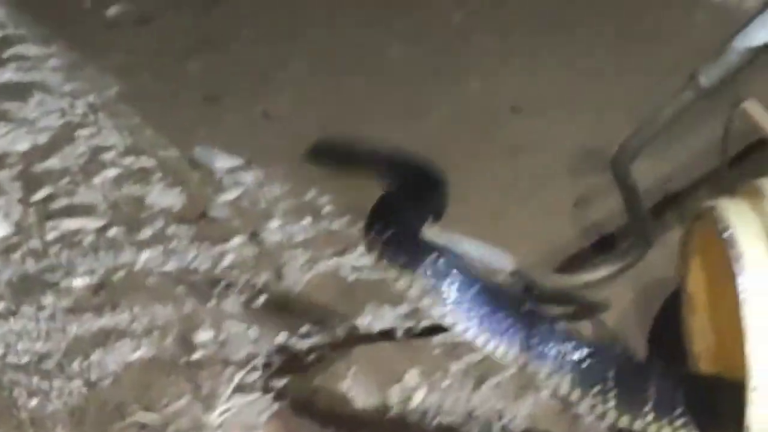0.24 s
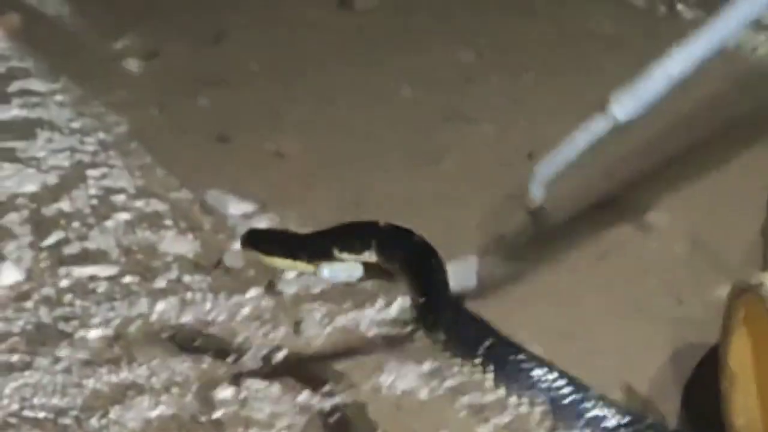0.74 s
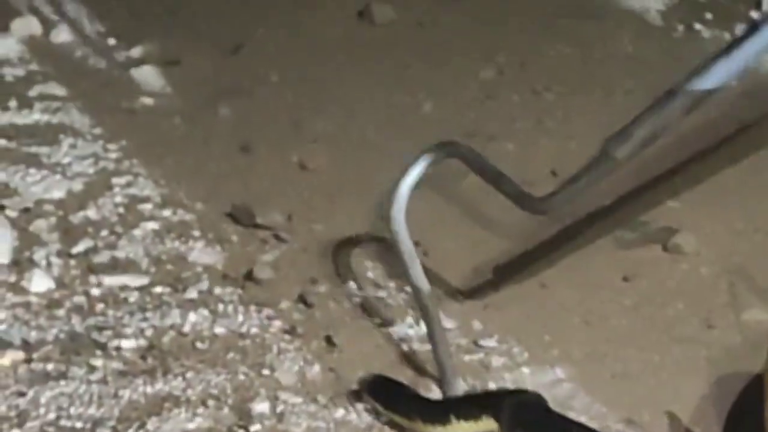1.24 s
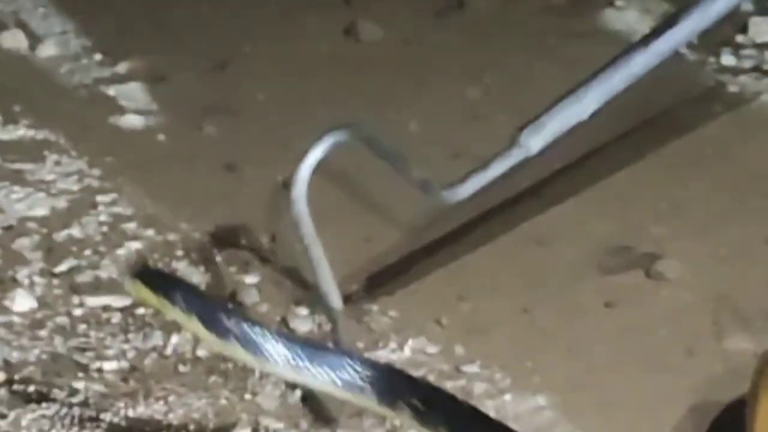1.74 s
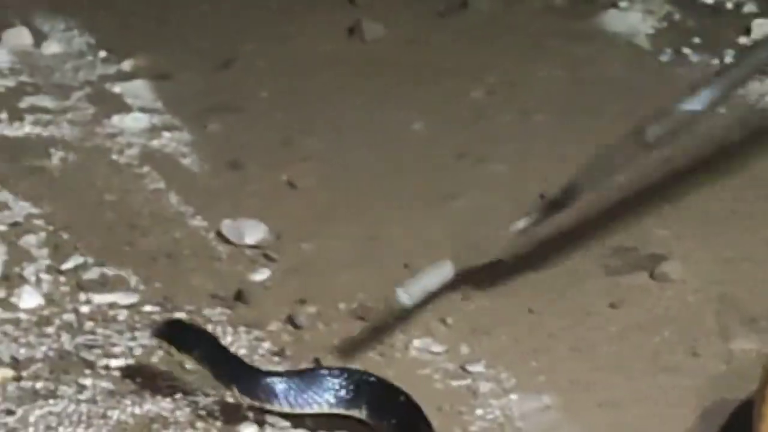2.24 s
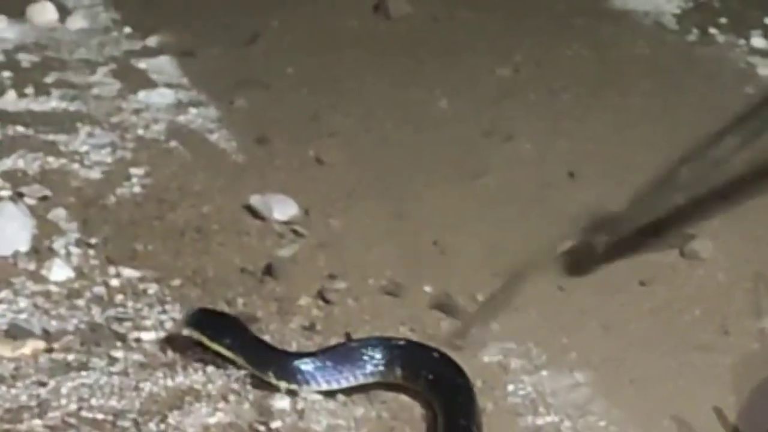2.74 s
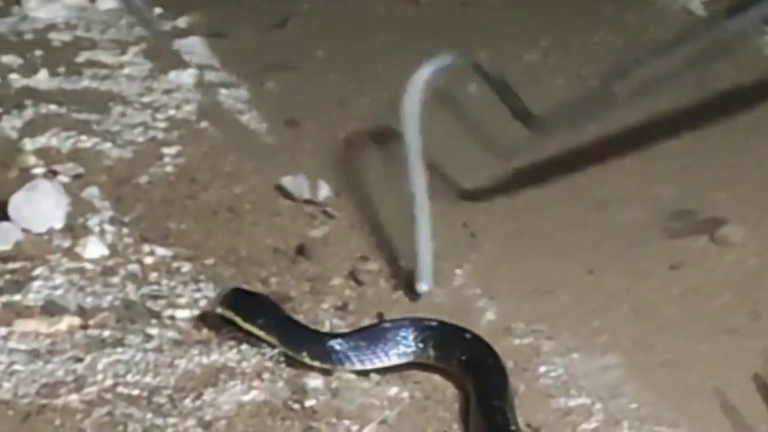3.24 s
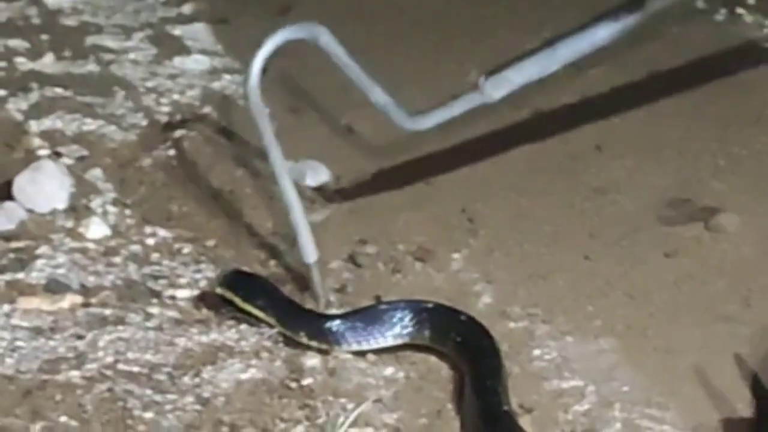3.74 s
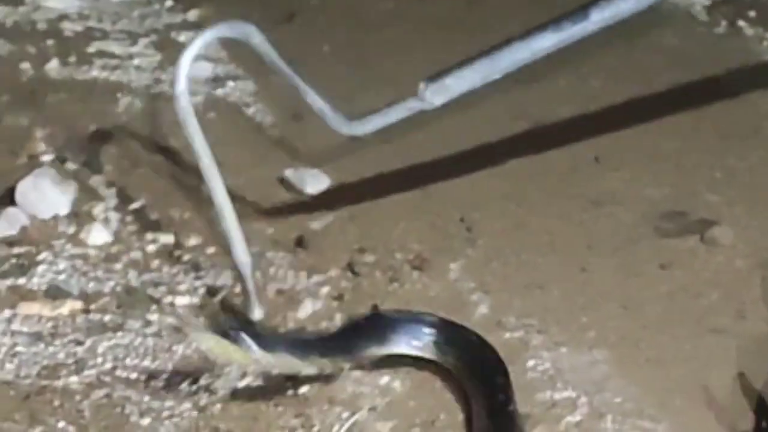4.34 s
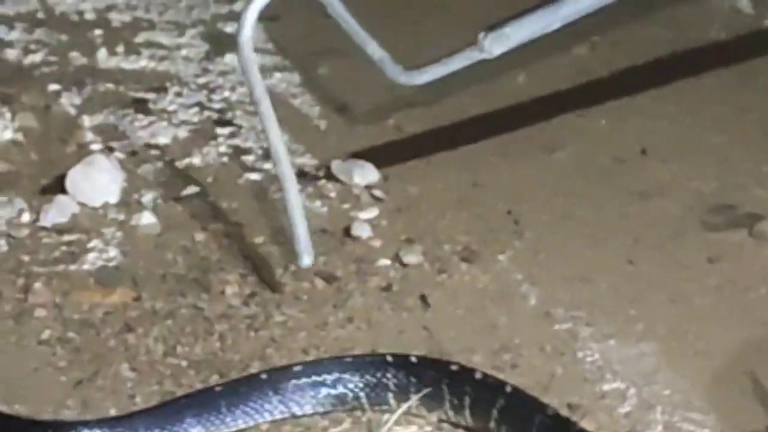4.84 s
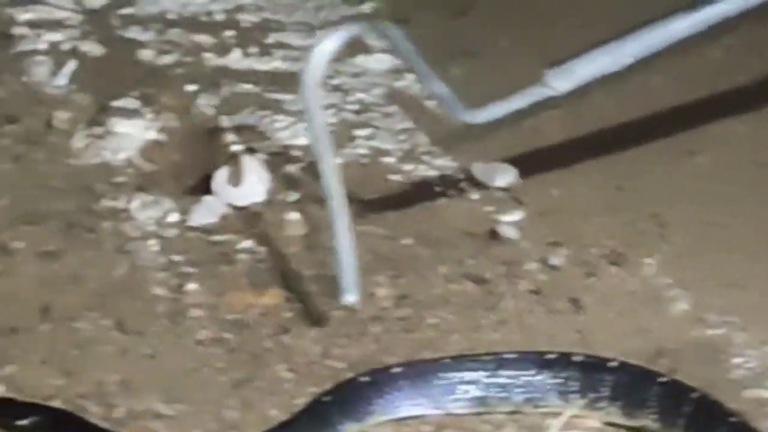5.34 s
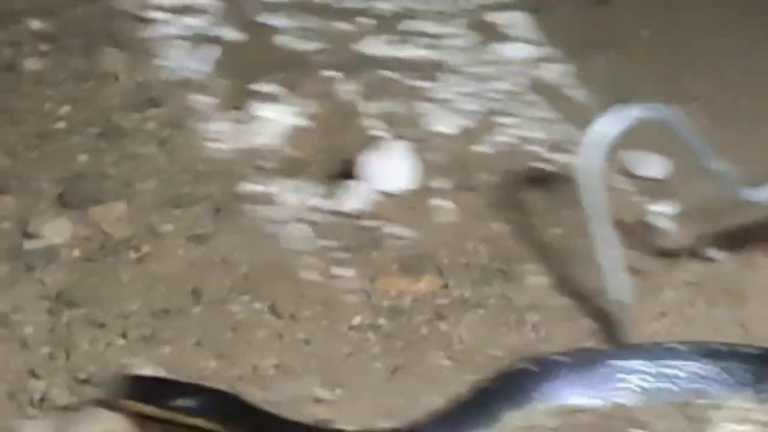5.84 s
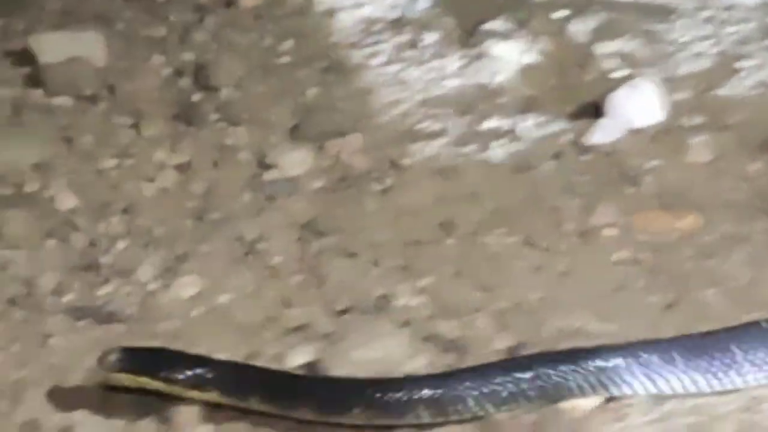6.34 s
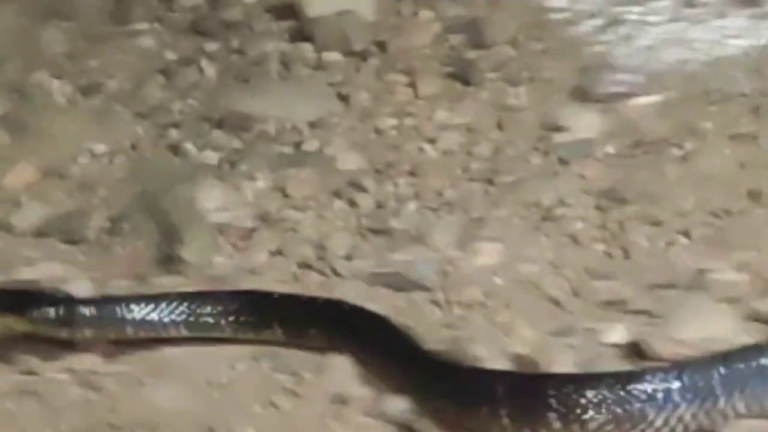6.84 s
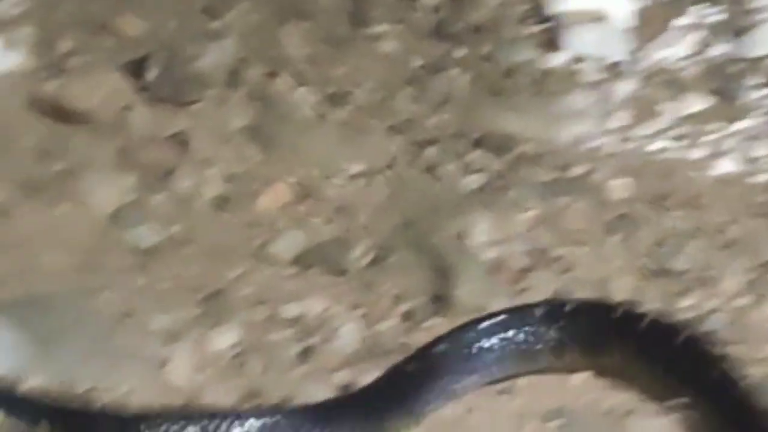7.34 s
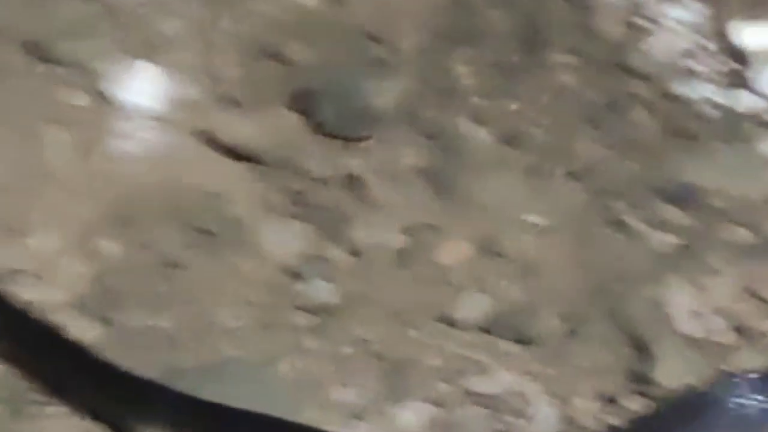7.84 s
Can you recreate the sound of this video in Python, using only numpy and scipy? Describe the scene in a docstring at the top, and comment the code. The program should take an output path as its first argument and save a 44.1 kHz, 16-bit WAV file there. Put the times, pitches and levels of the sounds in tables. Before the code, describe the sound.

A metal hook clicks, then clanks down and rings briefly, amid soft gravel footsteps and steady night insects.

```python
"""Night insects and a snake hook on gravel

Crickets trill with their wings, one chirps fast, and a katydid rasps in double strokes, over far
insect hiss, murmuring air and a faint hum. Shoes scuff and crunch softly on gravel. The metal hook
that steers a snake clicks now and then; once, just after a faint metallic hiss, it clanks down,
rings and rattles."""
import sys
import numpy as np
from scipy import signal
from scipy.fft import rfft, irfft
from scipy.io import wavfile

SR = 44100
rng = np.random.default_rng(int(sys.argv[2]) if len(sys.argv) > 2 else 0)


def output_pcm(signal):
    """Save a mono or channel-first signal as 16-bit PCM at the path in sys.argv[1].

    Samples are clipped to [-1, 1] before scaling.
    """
    pcm = np.clip(np.atleast_2d(signal).T, -1, 1) * 32767
    wavfile.write(sys.argv[1], SR, np.round(pcm).astype(np.int16))


N = 357210
TIME_S = np.arange(N) / SR
FREQS_HZ = np.maximum(np.arange(N // 2 + 1) * SR / N, 1)

# noise likeness between the ears: f/Hz, correlation
EAR_CORRELATION = [(25, 0.14), (80, 0.61), (250, 0.67), (600, 0.27), (1400, 0.047), (3000, 0.000055),
                   (14000, 0.042)]
# spectra of the air, three far insect bands and the katydid: f/Hz, relative density/dB
AIR_SPECTRUM = [(12, 0), (32, 3), (75, -4), (180, -10.5), (300, -18), (600, -21.5), (1000, -27),
                (1350, -25), (1800, -35), (4200, -38), (14000, -41)]
FAR_LOW_SPECTRUM = [(1850, -20), (2050, -14), (2170, -10.5), (2330, 1), (2620, -9), (2830, -44),
                    (2970, -16.5), (3250, -11.5), (3400, -15), (3700, -12), (3870, -15.5), (4100, -36)]
FAR_HIGH_SPECTRUM = [(4150, -26), (4500, -6.5), (4900, -7.5), (5700, -0.5), (6900, 0.5), (7400, -5.5),
                     (8000, -20), (9000, -32)]
FAR_TOP_SPECTRUM = [(6500, -30), (8000, -3.5), (9000, 4.5), (10200, 1.5), (11500, -2.5), (13000, -3),
                    (14300, -7)]
RASP_SPECTRUM = [(8000, -39), (9500, -12.5), (10500, -3.5), (11300, -3.5), (12000, -3.5), (12700, -17),
                 (14500, -21)]
# trilling crickets: f/Hz, level/dB, stroke rate/Hz
TRILLS = [(2033, -75.5, 26), (2250, -69, 37), (2304, -63.5, 38), (2366, -64.5, 38.5), (2398, -69.5, 40),
          (2490, -79.5, 47), (3546, -73, 39), (3740, -73.5, 56)]
# chirping cricket, fading then swelling: t/s, level/dB
CHIRP_LEVELS = [(0, -68.5), (.55, -73), (1.6, -79.5), (5.7, -78.5), (6.3, -68.5), (6.75, -63.5), (7.2, -68),
                (8.1, -71.5)]
# katydid pace: number of calls, period/s
KATYDID_PACE = [(9, .3235), (3, .306), (4, .3515), (9, .33)]

# shoe scuffs: t/s, length/s, relative level/dB
SCUFFS = [(0.0, .07, -59.5), (.095, 0.12, -60), (.52, 0.23, -73), (1.0, 0.24, -72.5), (1.8, 0.56, -67),
          (2.12, .04, -59), (2.195, 0.03, -55), (2.39, 1, -67), (3.1, 0.19, -68.5), (3.6, 0.22, -77.5),
          (4.39, .08, -71), (4.6, 0.61, -67), (4.79, 0.12, -59), (5.41, 0.065, -76), (5.8, 0.028, -68),
          (5.95, 0.42, -67), (6.155, .11, -53.5), (6.3, 0.22, -64), (6.55, 0.99, -66.5),
          (7.55, 0.42, -71.5), (8.07, .03, -56)]
# pebble knocks: t/s, relative level/dB
KNOCKS = [(0.033, -36.5), (0.057, -46), (0.105, -45), (0.195, -46), (0.215, -46), (0.331, -47),
          (1.135, -47), (2.553, -45.5), (2.804, -49), (3.305, -37.5), (5.977, -46.5), (6.729, -36.5),
          (7.76, -48)]
# spectra of grit and pebbles: f/Hz, relative density/dB
GRIT_SPECTRUM = [(100, -28), (200, -1.5), (400, 0.5), (800, 0), (1100, -4.5), (1600, 0), (2300, -5),
                 (3500, -5.5), (4300, -8.5), (6500, -6.5), (8200, -14.5), (13000, -15.5), (15000, -24)]
PEBBLE_SPECTRUM = [(120, -4), (350, -6.5), (700, -0.5), (1100, -2), (1600, 0.5), (2200, -12), (4000, -22),
                   (9000, -27), (15000, -40)]
# hollow tones of shuffling: t/s, f/Hz, level/dB, width/s
HOLLOWS = [(.08, 400, -69, 0.073), (.15, 760, -65.5, 0.088), (.17, 227.6, -66, 0.068),
           (2.05, 300, -74, 0.17), (3.82, 1353, -75, 0.16), (4.78, 840, -67.5, 0.2),
           (4.88, 420, -63, 0.065), (4.98, 320, -66, 0.12), (6.48, 505, -54, 0.015), (7.43, 340, -69, .04)]

# light hook contacts: t/s, level/dB, t60/s, relative sparkle/dB
CLICKS = [(1.138, -44, 0.1, -10), (2.474, -49, .025, -18), (2.8473, -25, 0.089, -12),
          (2.967, -39, 0.069, -22), (3.183, -48, 0.11, -14), (4.781, -48, 0.036, -13),
          (4.861, -40, 0.13, -8), (4.884, -36, 0.083, -0.5), (7.2864, -43, 0.032, -6),
          (7.2905, -35.5, 0.047, -9)]
# modes of the lightly touched hook: f/Hz, relative level/dB
CLICK_MODES = [(3060, -8), (3520, -11), (4500, -13), (4880, -9), (5850, -3), (6500, -4), (6950, 0),
               (7340, 0), (9400, -12), (12550, -12), (13150, -12)]
# spectra of a click, its fine top and the clank's crack: f/Hz, relative density/dB
CLICK_SPECTRUM = [(400, -29), (1500, -22), (3500, -14), (4200, -11), (5000, -8), (5850, -1.5), (6200, -2),
                  (6700, -1), (7350, 2), (8000, -14), (10000, -10), (11500, -16), (13000, -33),
                  (14500, -32)]
SPARKLE_SPECTRUM = [(7000, -14), (8500, -6), (10000, -7), (11500, -7), (12600, 0), (13400, 0), (14500, -6)]
CRACK_SPECTRUM = [(100, -5.5), (330, -17.5), (520, 4.5), (950, -20), (1550, 4), (2900, 1.5), (4200, -1),
                  (5200, 2.5), (7000, -9), (9000, -9.5), (14000, -15)]
# modes of the struck hook: f/Hz, relative level/dB, t60/s, left minus right/dB
HOOK_MODES = [(520, -41, .07, -4), (660, -47, .18, -3), (1150, -55, .2, -3), (1480, -38, .13, -3),
              (1952, -43, .25, 0), (2169, -28.5, .17, 1), (2432, -41, .28, 6), (2688, -37, .2, 0),
              (2918, -33, .26, -12), (3066, -25.5, .2, -10), (3510, -39, .24, 0), (3976, -32, .2, 0),
              (4040, -32, .26, -2), (4500, -42, .25, 0), (4846, -33, .22, 1), (5262, -33, .18, -12),
              (5305, -25, .2, -19), (5832, -27, .18, -12), (6408, -28, .2, -16), (6452, -17, .21, -22),
              (6971, -28, .3, -13), (7342, -34, .28, -12), (7930, -43, .18, 0), (8640, -35, .15, 2),
              (9340, -45, .18, 2), (10070, -43, .17, -12), (11800, -47, .2, 1), (12510, -49, .22, -3),
              (13200, -47, .17, -5), (13640, -49, .22, -4)]
# metallic rattles: t/s, length/s, relative level/dB
# row two is a faint metallic hiss just before the clank; in the others the tip scrapes the ground
RATTLES = [(1.18, 0.022, -54.5), (2.82, 0.038, -46), (2.868, 0.02, -27.5), (2.92, .08, -45.5),
           (3.025, .06, -43.5), (3.11, 0.03, -51.5), (3.595, 0.022, -63), (5.43, 0.035, -58)]
# drive of the modes in a rattle: f/Hz, relative gain/dB
RATTLE_DRIVE = [(500, -22), (2000, -15), (3000, -8), (4000, -11), (4850, 0), (5300, -8), (5850, 2),
                (6450, -7), (7200, 2), (8200, -15), (13500, -17)]


def from_db(db):
    """Decibels to gain."""
    return 10 ** (np.asarray(db) / 20)


def unit_rms(x):
    """Scale to unit power."""
    return x / np.sqrt(np.mean(x ** 2) + 1e-20)


def at_hz(points, hz):
    """Interpolate on a log-frequency axis."""
    points_hz, values = np.transpose(points)
    return np.interp(np.log(hz), np.log(points_hz), values)


def pan(side_db):
    """Constant-power gains; positive is left."""
    return unit_rms(from_db(np.array([[side_db], [-side_db]]) / 2))


def drift(rate_hz):
    """Random wander of unit RMS."""
    size = 8192
    hz = np.arange(size // 2 + 1) * SR / N
    slow = irfft(rfft(rng.standard_normal(size)) / (1 + (hz / rate_hz) ** 2))
    return np.interp(TIME_S, np.linspace(0, N / SR, size), unit_rms(slow))


def white():
    """Independent noise at each ear."""
    return rng.standard_normal((2, N))


def colour(pair, spectrum):
    """Shape a noise pair to a spectrum at unit RMS; the ears are alike mainly in the bass."""
    alike = np.clip(at_hz(EAR_CORRELATION, FREQS_HZ), -1, 1)
    rolloff = 1 / (1 + (spectrum[0][0] / FREQS_HZ) ** 4) / (1 + (FREQS_HZ / spectrum[-1][0]) ** 4)
    mid, side = rfft(pair) * from_db(at_hz(spectrum, FREQS_HZ)) * rolloff
    return unit_rms(irfft(np.sqrt(1 + alike) * mid + np.sqrt(1 - alike) * side * [[1], [-1]], N))


def grains(per_s, spread_db):
    """Random tiny contacts of uneven size."""
    hits = rng.random(N) < per_s / SR
    sizes = from_db(spread_db * np.minimum(rng.exponential(1, N), 3.5))
    return hits * sizes * white()


def burst(start_s, t60_s, rise_s):
    """Envelope of one contact."""
    out, first = np.zeros(N), max(int(start_s * SR), 0)
    age_s = TIME_S[:min(int(2 * t60_s * SR), N - first)]
    out[first:first + len(age_s)] = -np.expm1(-age_s / rise_s) * from_db(-60 * age_s / t60_s)
    return out


def swells(rows, attack_s, release_s):
    """Envelope of swells that build, hold and die away; powers add."""
    power = np.zeros(N)
    for start_s, length_s, db in rows:
        span = slice(max(int(start_s * SR), 0), int((start_s + length_s + 8 * release_s) * SR))
        age_s = np.maximum(TIME_S[span] - start_s, 0)
        rise = -np.expm1(-age_s / attack_s)
        fall = np.exp(-np.maximum(age_s - length_s, 0) / release_s)
        power[span] += (from_db(db) * rise * fall) ** 2
    return np.sqrt(power)


def scatter(x, t60_s, wet_db):
    """Ground, walls and plants add a diffuse tail, different at each ear."""
    age_s = TIME_S[:int(t60_s * SR)]
    tail = rng.standard_normal((2, len(age_s))) * from_db(-60 * age_s / t60_s)
    tail /= np.sqrt(np.sum(tail ** 2, axis=1, keepdims=True))
    return x + from_db(wet_db) * signal.fftconvolve(np.atleast_2d(x), tail, axes=1)[:, :N]


def night_bed():
    """Far insects merge into bands of hiss above the murmur of the air."""
    low = from_db(-61) * colour(white(), FAR_LOW_SPECTRUM) * pan(-1.4)
    high = from_db(-67.5) * colour(white(), FAR_HIGH_SPECTRUM) * pan(-4.5) * from_db(.48 * drift(19))
    top = from_db(-74) * colour(white(), FAR_TOP_SPECTRUM) * pan(3.7)
    air = from_db(-60.5) * colour(white(), AIR_SPECTRUM)
    return low + high + top + air


def far_hum(hz=80.7, level_db=-69.5):
    """A faint low tone, wavering in phase and level."""
    tone = np.sin(2 * np.pi * hz * TIME_S + .8 * drift(2.8))
    return from_db(level_db) * unit_rms(tone * from_db(2 * drift(3.3)))


def wing_song(hz, strokes, duty, sag, wander):
    """Each wing stroke is a short tone whose pitch sags as the scraper slows."""
    progress = np.minimum(strokes % 1 / duty, 1)
    pitch_hz = hz * (1 - sag * (progress - .5) + wander * drift(25.3))
    return np.sin(np.pi * progress) * np.sin(2 * np.pi * np.cumsum(pitch_hz) / SR)


def cricket_chorus():
    """Wing trills smeared by distance."""
    out = 0
    for hz, db, stroke_hz in TRILLS:
        strokes = np.cumsum(stroke_hz * (1 + .0143 * drift(1.98))) / SR + rng.random()
        song = wing_song(hz, strokes, duty=.6, sag=.035, wander=.007) * from_db(2.7 * drift(9.5))
        out += from_db(db) * unit_rms(scatter(song, t60_s=.22, wet_db=8))
    return out * pan(-4.5)


def near_cricket(hz=3228, first_s=.006, period_s=.07575):
    """Fast, even chirps of one wing stroke each."""
    strokes = (TIME_S - first_s) / period_s
    song = wing_song(hz, strokes, duty=.7, sag=.004, wander=.0026)
    level_db = np.interp(TIME_S, *np.transpose(CHIRP_LEVELS))
    return from_db(level_db) * unit_rms(scatter(song, t60_s=.12, wet_db=-8)) * pan(-5.5)


def katydid(first_s=-.045, gap_s=.1, width_s=.041):
    """Two swelling rasps of the wing file per call; the pace shifts slightly now and then."""
    periods_s = [period_s for count, period_s in KATYDID_PACE for _ in range(count)]
    calls_s = first_s + np.cumsum([0] + periods_s)
    calls_db = -67 + .7 * rng.standard_normal(len(calls_s))
    nearest = np.searchsorted((calls_s[1:] + calls_s[:-1]) / 2, TIME_S)
    age_s = TIME_S - calls_s[nearest]
    strokes = np.exp(-(age_s / width_s) ** 2) + np.exp(-((age_s - gap_s) / width_s) ** 2)
    return from_db(calls_db[nearest]) * strokes * colour(white(), RASP_SPECTRUM) * pan(3.5)


def gravel(floor_db=-81.5, flutter_db=2):
    """Grit grinds under a shoe, coarser stones crunch, and the odd pebble knocks."""
    effort = from_db(floor_db) + swells(SCUFFS, attack_s=.0074, release_s=.036)
    grit = colour(grains(per_s=4000, spread_db=3), GRIT_SPECTRUM) * from_db(flutter_db * drift(30))
    crunch = from_db(-6.5) * colour(grains(per_s=170, spread_db=2), PEBBLE_SPECTRUM)
    impacts = sum(from_db(db + 3) * burst(start_s, t60_s=.015, rise_s=.0012) for start_s, db in KNOCKS)
    knocks = impacts * colour(white(), PEBBLE_SPECTRUM)
    scuffs = scatter(effort * (grit + crunch), t60_s=.12, wet_db=-2.5)
    return (scuffs + scatter(knocks, t60_s=.098, wet_db=-5)) * pan(-2.6)


def hollow_shuffles(wander=.06):
    """Shuffling sounds soft hollow tones, each a brief swell of an unsteady resonance."""
    out = np.zeros(N)
    for peak_s, hz, db, width_s in HOLLOWS:
        pitch_hz = hz * (1 + wander * drift(45.15))
        tone = np.sin(2 * np.pi * np.cumsum(pitch_hz) / SR) * from_db(3 * drift(45))
        swell = np.exp(-((TIME_S - peak_s) / width_s) ** 2)
        out += from_db(db) * swell * unit_rms(tone)
    return scatter(out, t60_s=.12, wet_db=-8)


def hook_clicks():
    """Light touches give bright clicks with a damped ring; the sharpest sparkle on top."""
    crack = colour(white(), CLICK_SPECTRUM)
    sparkle = colour(white(), SPARKLE_SPECTRUM)
    ring = sum(from_db(db) * np.sin(2 * np.pi * (hz * TIME_S + rng.random((2, 1))) + drift(19))
               for hz, db in CLICK_MODES)
    metal = from_db(-4) * crack + from_db(-2) * unit_rms(ring)
    out = 0
    for start_s, db, t60_s, sparkle_db in CLICKS:
        envelope = from_db(db) * burst(start_s, t60_s, rise_s=.00089)
        out += envelope * (metal + from_db(sparkle_db) * sparkle)
    return scatter(out * pan(-5.5), t60_s=.13, wet_db=-10.5)


def hook_rattle(hiss_cutoff_hz=7600):
    """Dense ticks shake the hook's modes: brief rattles, and a faint metallic hiss before the clank."""
    ticks = grains(per_s=2700, spread_db=0)
    modes = 0
    for hz, _, t60_s, _ in HOOK_MODES:
        radius, angle = from_db(-60 / (t60_s * SR)), 2 * np.pi * hz / SR
        feedback = [1, -2 * radius * np.cos(angle), radius ** 2]
        mode = signal.lfilter([0, np.sin(angle)], feedback, ticks + 1e-18)
        modes += from_db(at_hz(RATTLE_DRIVE, hz)) * mode
    lowpass = signal.butter(4, hiss_cutoff_hz, fs=SR, output="sos")
    hiss = from_db(-9) * signal.sosfilt(lowpass, colour(ticks, CLICK_SPECTRUM))
    envelope = swells(RATTLES, attack_s=.0065, release_s=.025) * from_db(2 * drift(45))
    return envelope * (unit_rms(modes) + hiss) * pan(-8)


def hook_ring(start_s, left_lag_s=.000055):
    """The shaft's modes build up, high ones last, and waver as the tip still touches the ground."""
    ear_time_s = TIME_S - [[left_lag_s], [0]]
    out = 0
    for hz, db, t60_s, side_db in HOOK_MODES:
        tone = np.sin(2 * np.pi * (hz * ear_time_s + rng.random()) + .3 * drift(35))
        delay_s = .009 * min(hz / 6000, 1) ** 2
        envelope = from_db(db + 4) * burst(start_s + delay_s, t60_s, rise_s=.011)
        out += envelope * tone * pan(side_db)
    return out


def hook_clank(start_s=2.8635):
    """The hook strikes the ground once with a crack and rings; brief rattles come before and after."""
    rattle = hook_rattle()
    ring = hook_ring(start_s)
    crack = from_db(-21) * burst(start_s, t60_s=.074, rise_s=.00084) * colour(white(), CRACK_SPECTRUM)
    return ring + scatter(crack + rattle, t60_s=.22, wet_db=-16)


def scene():
    """Insects all around; shoes, gravel and hook close by."""
    background = night_bed() + cricket_chorus() + near_cricket() + katydid() + far_hum()
    return background + gravel() + hollow_shuffles() + hook_clicks() + hook_clank()


def record(dry):
    """Steep low-pass on the top treble."""
    cutoff_hz = 14350
    return signal.sosfilt(signal.ellip(10, .2, 80, cutoff_hz, fs=SR, output="sos"), dry)


dry = scene()
out = record(dry)
output_pcm(out)
```